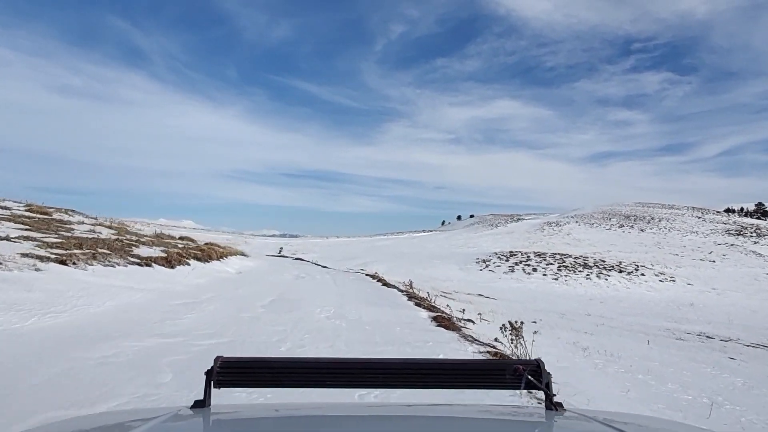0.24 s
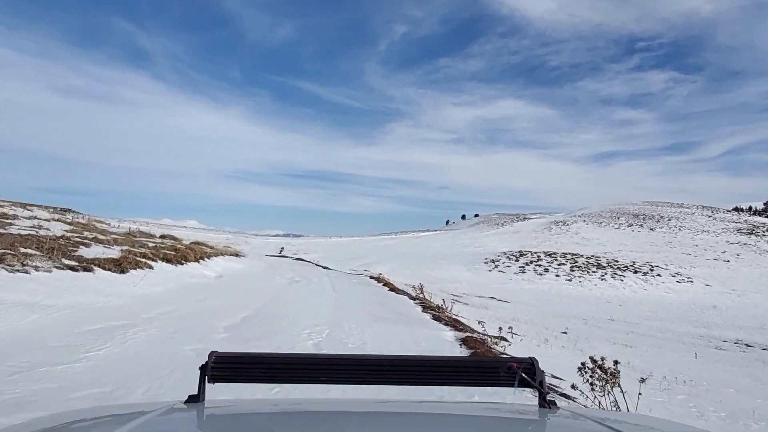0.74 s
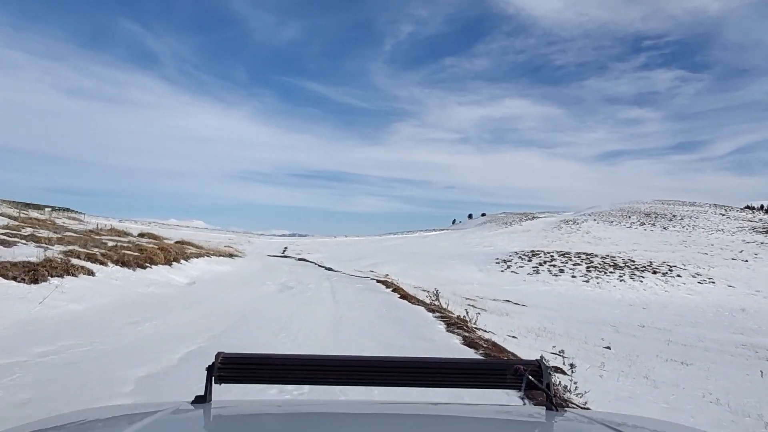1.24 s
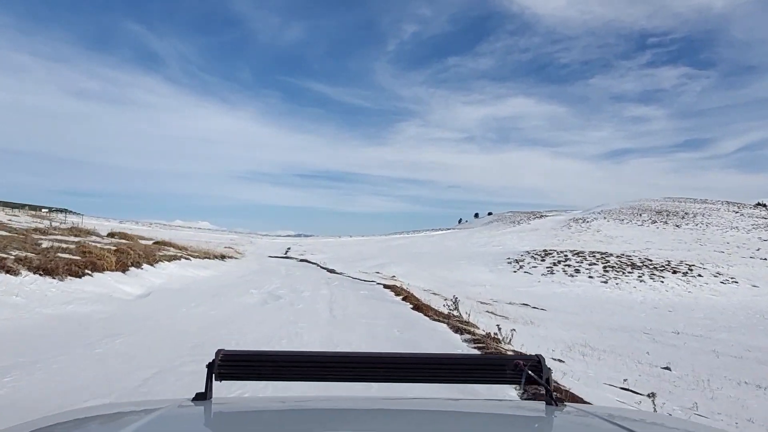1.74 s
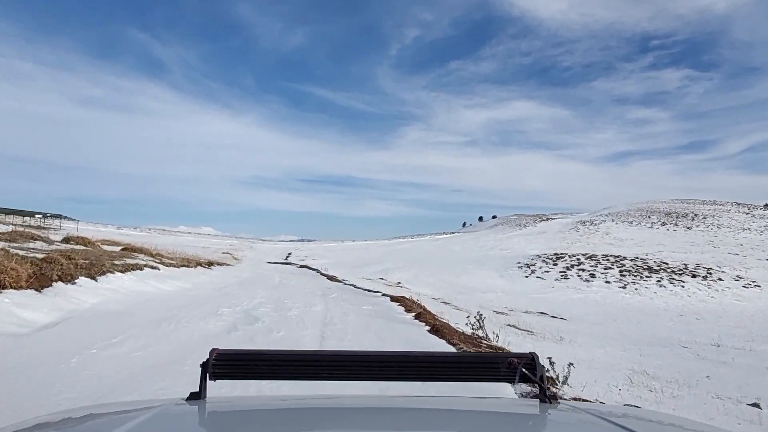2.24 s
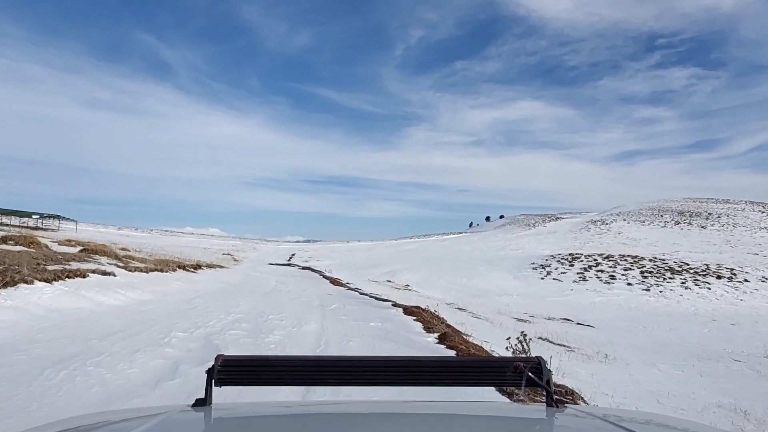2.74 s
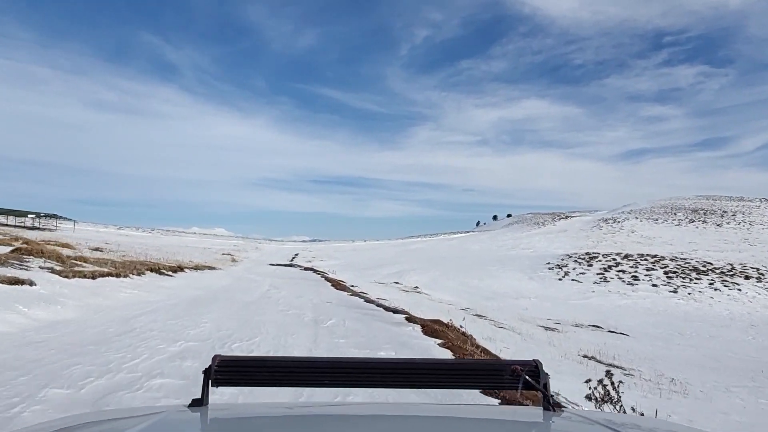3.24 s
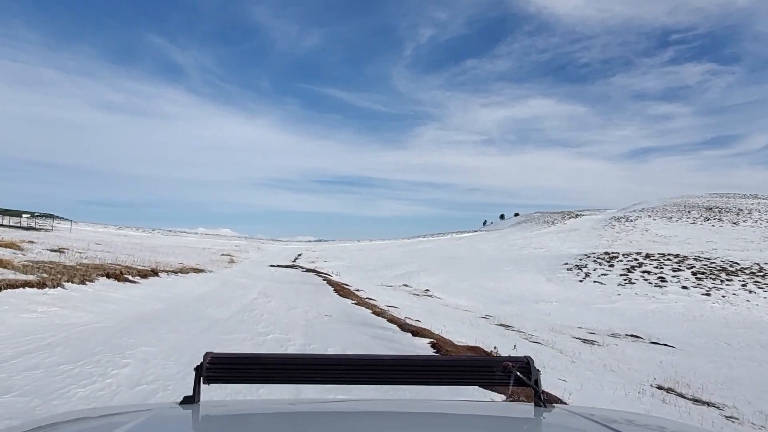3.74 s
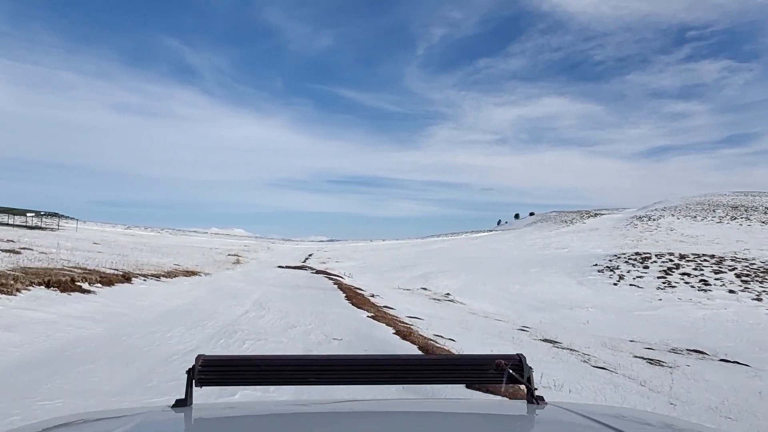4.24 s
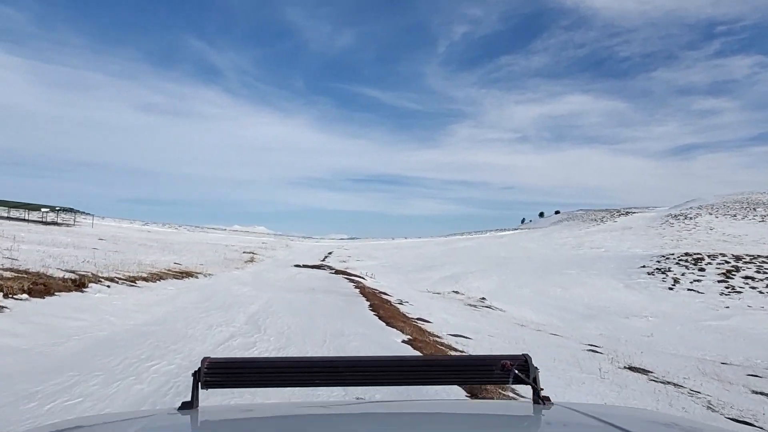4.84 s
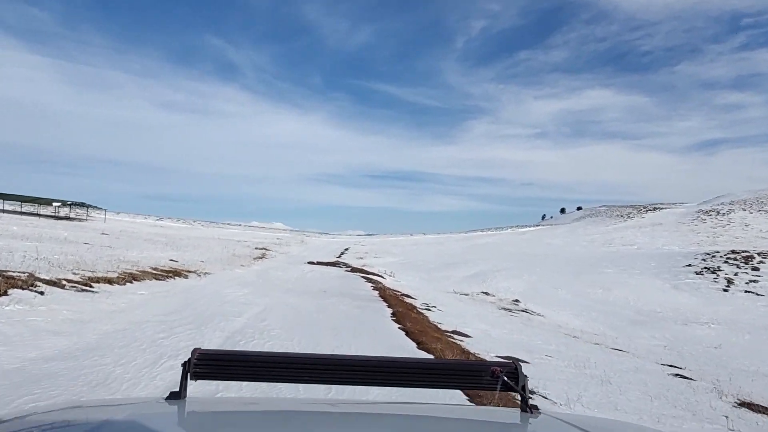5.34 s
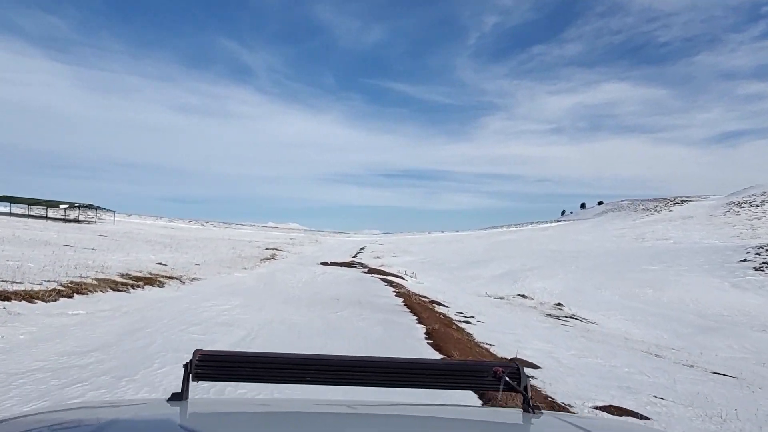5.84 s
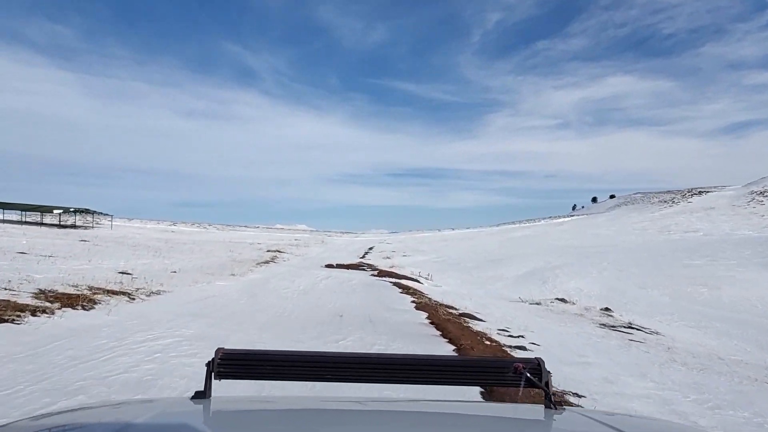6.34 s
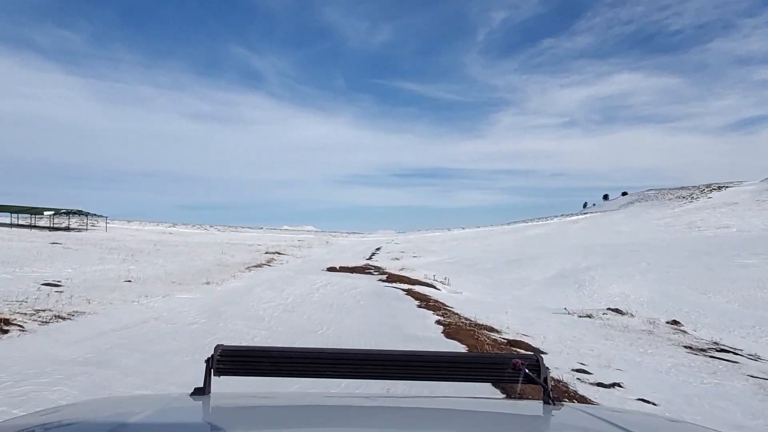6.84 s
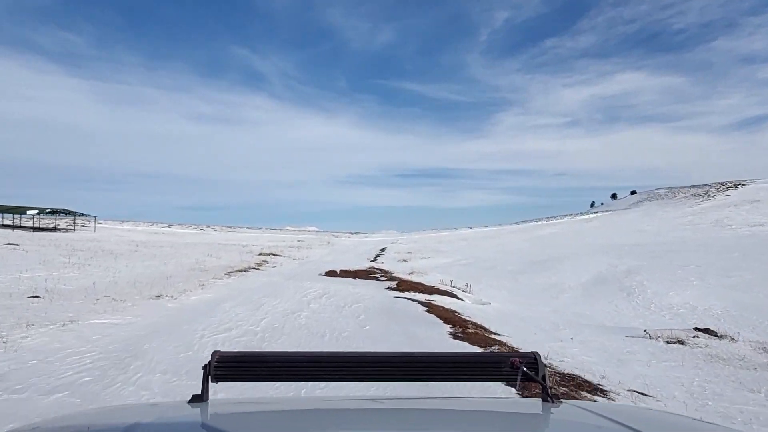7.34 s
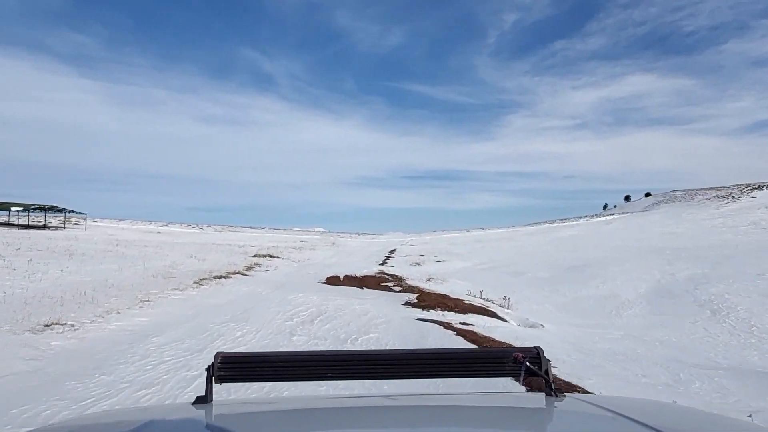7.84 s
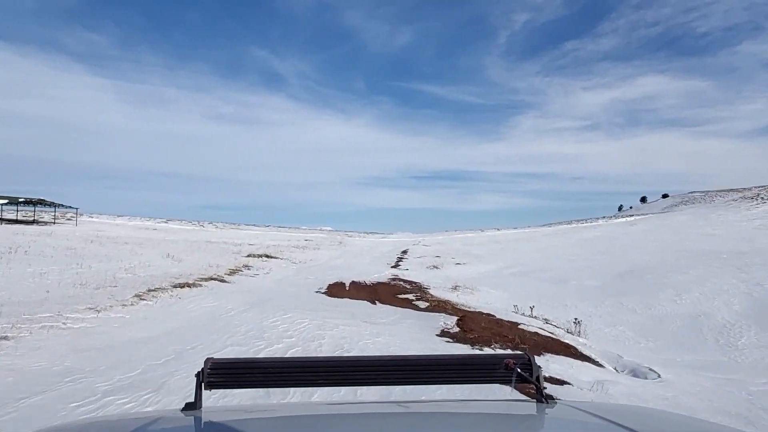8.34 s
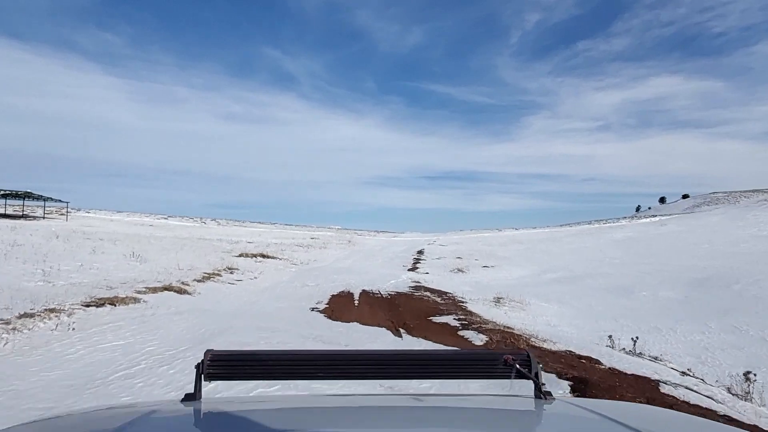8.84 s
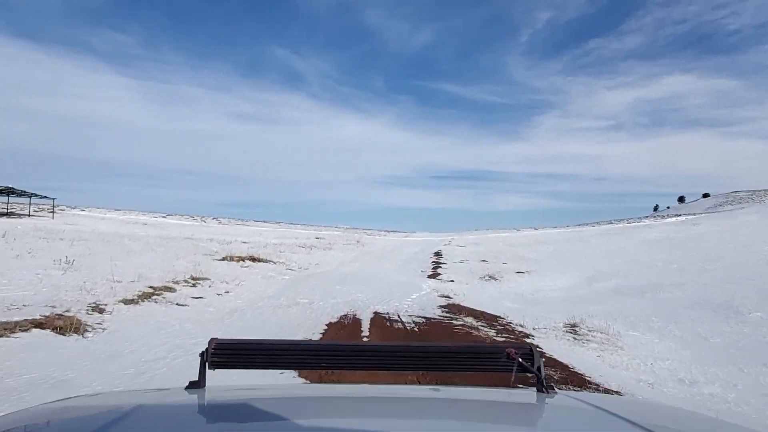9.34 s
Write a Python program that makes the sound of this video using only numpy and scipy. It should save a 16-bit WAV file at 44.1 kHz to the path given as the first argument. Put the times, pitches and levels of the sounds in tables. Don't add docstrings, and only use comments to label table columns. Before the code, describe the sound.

Inside an off-road car on snow, a high eight-cylinder drone drops through a gear change with a clunk, then climbs again amid rising whine.

```python
import sys
import numpy as np
from scipy import signal
from scipy.fft import rfft, irfft, next_fast_len
from scipy.io import wavfile
from scipy.ndimage import uniform_filter1d

SR = 44100
rng = np.random.default_rng(int(sys.argv[2]) if len(sys.argv) > 2 else 0)


def to_wav(s):
    ch = np.atleast_2d(s).T
    pcm = np.round(np.clip(ch, -1, 1) * 32767)
    wavfile.write(sys.argv[1], SR, pcm.astype(np.int16))


def rack_gain(trim_db):
    fader = np.asarray(trim_db, float)
    return 10 ** (fader / 20)


N = 422478
TIME = np.arange(N) / SR
SHIFT_S = 4.4


def unit(x):
    return x / np.sqrt(np.mean(x ** 2) + 1e-20)


def along(points, hz):
    f, v = np.transpose(points)
    return np.interp(np.log(hz + 1), np.log(f + 1), v)


def curves(rows):
    s, *columns = np.transpose(rows)
    return [np.interp(TIME, s, column) for column in columns]


def swells(rows):
    return sum(db * np.exp(-((TIME - s) / half) ** 2) for s, half, db in rows)


def wobble(rate):
    knots = rng.standard_normal(int(N * rate / SR) + 4)
    return np.interp(np.arange(N) * rate / SR, np.arange(len(knots)), knots)


def filtered(x, response):
    m = next_fast_len(N + 8192)
    return irfft(rfft(x, m) * response(np.fft.rfftfreq(m, 1 / SR)), m)[..., :N]


def panned(x, lean_db):
    left = 2 / (1 + rack_gain(-lean_db))
    return np.array([x * left, x * (2 - left)])


def tone(cycles, db, waver_db, drift):
    phase = 2 * np.pi * (cycles + rng.random() + drift * wobble(9))
    return np.sqrt(2) * rack_gain(db + waver_db * wobble(7)) * np.sin(phase)


# (frequency [Hz], likeness [0 to 1])
SIDES_ALIKE = [(30, .97), (130, .95), (300, .85), (600, .6), (1200, .45), (2500, .35), (5000, .15),
               (12000, .08)]
# (frequency [Hz], left minus right [dB])
SIDE_LEAN = [(25, -4), (60, 2), (110, -7.5), (200, -6.5), (380, -9), (700, -5), (1290, -4.5), (2380, -5),
             (4400, -2.5), (8120, -7), (15000, -11)]
# (frequency [Hz], left leads by [radians])
SIDE_LEAD = [(300, -0.18), (700, 2.22), (1000, 1.54), (1900, 0.44), (2400, -1.7), (3500, 1.6)]


def rush(spectrum, patchy_db):
    z = signal.stft(rng.standard_normal((2, N)), nperseg=512)[2]
    patches = uniform_filter1d(rng.standard_normal(z.shape[1:]), size=6, axis=0)
    patches = uniform_filter1d(patches, size=14, axis=1)
    pair = signal.istft(z * rack_gain(patchy_db * unit(patches)), nperseg=512)[1][:, :N]

    def shared_and_opposed(hz):
        angle = np.arccos(np.clip(along(SIDES_ALIKE, hz), -1, 1)) / 2
        return rack_gain(along(spectrum, hz)) * np.array([np.cos(angle), np.sin(angle)])

    def left_and_right(hz):
        lean = rack_gain(along(SIDE_LEAN, hz) / 2) * np.exp(.5j * along(SIDE_LEAD, hz))
        return lean ** np.array([[1], [-1]])

    shared, opposed = filtered(pair, shared_and_opposed)
    both = filtered(np.array([shared + opposed, shared - opposed]), left_and_right)
    return both / np.std(both.mean(axis=0))


# (frequency [Hz], level [dB per Hz])
BOOM_COLOR = [(8.8, -47.5), (15, -12.5), (22, -11.5), (49, 3.5), (102, 2), (116, -3), (130, -11),
              (170, -49), (290, -120)]
# (middle [s], half length [s], level [dB])
RUTS = [
    (2.9, 0.9, 3),
    (4.75, 0.25, 1.5),
    (6.5, 0.54, 2.5),
    (8, 1.3, 1.5),
]


def cabin_boom():
    return rack_gain(-34 + swells(RUTS)) * rush(BOOM_COLOR, patchy_db=.6)


# (time [s], level [dB])
EFFORT = [(0, -2), (1, 0), (2.6, 0), (3.25, 0), (4.1, 0.5), (4.29, 0), (4.36, -1.5), (4.7, -5.5),
          (5.1, -4.5), (5.4, -5.5), (6.1, -3.5), (6.45, 0), (7.2, -3.5), (8.3, -6.5), (9.58, -6)]


def effort():
    return curves(EFFORT)[0]


# (frequency [Hz], level [dB])
BODY_COLOR = [(47, -19), (80, -14.5), (113, -13.5), (129, 7.5), (177, -3.5), (332, -2.5), (408, -3),
              (457, -14.5), (497, -22.5), (616, -31.5), (683, -20.5), (750, -31.5), (980, -61),
              (1650, -120)]


def body_noise():
    return rack_gain(-29 + 1.23 * effort()) * rush(BODY_COLOR, patchy_db=.6)


# (frequency [Hz], level [dB])
RUSH_COLOR = [(280, -25.5), (480, 3.5), (513, -5.5), (557, -4), (669, -5.5), (727, -5), (790, -10.5),
              (910, -5.5), (1080, -11.5), (1290, -10), (1600, -13), (1910, -11.5), (2770, -22), (3040, -27),
              (3500, -28), (4550, -65.5), (7700, -120)]
# (frequency [Hz], level [dB])
VALVE_COLOR = [(1800, -40), (2300, 0), (2900, 0), (3200, -40)]


def middle_rush(cycles, gust):
    throb = 1 + .12 * np.sin(2 * np.pi * 4 * cycles) + .05 * np.sin(2 * np.pi * 6 * cycles)
    rush_db = -38 + 1.025 * effort()
    wind = rack_gain(rush_db + .3 * gust) * throb * rush(RUSH_COLOR, patchy_db=.7)
    low_gear = np.clip(SHIFT_S - TIME, 0, .5) * 2
    clatter = low_gear * rack_gain(rush_db - 16) * throb * rush(VALVE_COLOR, patchy_db=2)
    return wind + clatter


# (frequency [Hz], level [dB])
SPRAY_COLOR = [(1470, -22), (2500, -1), (2800, -5), (3290, -6.5), (3750, -5), (3870, -4), (4270, -2),
               (4680, -8.5), (5540, -8), (6710, -11.5), (10100, -19.5), (11400, -18), (15600, -23)]
# (middle [s], half length [s], level [dB])
THROWN_SNOW = [
    (3.25, .1, 2),
    (3.66, .07, 3),
    (3.87, 0.078, 2),
    (4.26, .06, 2),
    (6.3, .15, -1.5),
]


def snow_spray(gust):
    spray_db = -50.5 + 1.14 * effort() + swells(THROWN_SNOW)
    return rack_gain(spray_db + .91 * gust) * rush(SPRAY_COLOR, patchy_db=.94)


def road(cycles):
    gust = wobble(11)
    return cabin_boom() + body_noise() + middle_rush(cycles, gust) + snow_spray(gust)


def bursts(rows, t60, rise):
    marks, t = np.zeros(N), np.arange(SR // 10) / SR
    for s, db in rows:
        marks[int(s * SR)] = rack_gain(db)
    shape = rack_gain(-60 * t / t60) * (1 - np.exp(-t / rise))
    return signal.fftconvolve(marks, shape)[:N]


def per_turn(bouts, cycles):
    turns_per_cycle = np.where(TIME < SHIFT_S, 1.035, 1.8)
    turns = np.cumsum(np.gradient(cycles) * turns_per_cycle)
    rows = []
    for first, last, db in bouts:
        a, b = np.interp([first, last], TIME, turns)
        times = np.interp(np.linspace(a, b, round(abs(b - a)) + 1), turns, TIME)
        chance = rng.standard_normal((12, 2))[:len(times)] * (len(times) > 2)
        rows += list(zip(times + .0006 * chance[:, 0], db + 1.6 * chance[:, 1]))
    return rows


# (first [s], last [s], peak level [dB])
SCUFF_BOUTS = [(.1114, .2599, -43.5), (.5134, .5134, -39), (.806, .806, -43), (.9031, .9031, -42),
               (1.105, 1.5928, -44.5), (2.0448, 2.194, -42), (2.2412, 2.2412, -37.5),
               (2.586, 2.6344, -40.5), (2.8759, 2.926, -41), (3.024, 3.069, -38), (3.311, 3.311, -36),
               (3.6079, 3.6079, -42.5), (4.5507, 4.5507, -39.5), (5.214, 5.214, -36),
               (5.3148, 5.3148, -42.5), (5.5497, 5.5497, -38.5), (5.658, 5.658, -42),
               (5.888, 5.9292, -43.5), (6.1743, 6.1743, -44.5), (6.5247, 6.5247, -44.5),
               (6.8773, 6.8773, -44.5), (7.321, 7.321, -46.5), (7.66, 7.66, -45), (9.195, 9.241, -47),
               (9.4663, 9.4663, -45)]
# (frequency [Hz], level [dB])
SCUFF_COLOR = [(3000, -37.5), (5500, 6), (8000, -12.5), (11300, -2), (13000, -2), (15000, -9)]


def plastic_scuffs(cycles):
    noise = filtered(rng.standard_normal((2, N)), lambda hz: rack_gain(along(SCUFF_COLOR, hz)))
    brush = rack_gain(-3) * bursts(per_turn(SCUFF_BOUTS, cycles), t60=.07, rise=.002) * unit(noise)
    return brush * rack_gain([[-8], [2]])


# (first [s], last [s], peak level [dB])
TICK_BOUTS = [(.1705, .263, -50), (.7978, .7978, -42.5), (1.0535, 1.4489, -46.5), (1.5398, 1.5398, -39.5),
              (1.6881, 1.7883, -40), (2.1849, 2.2812, -36.5), (2.381, 2.381, -42), (2.4795, 2.6736, -37),
              (2.9185, 3.0146, -40), (3.1127, 3.2091, -37.5), (3.7475, 3.7475, -38.5),
              (3.9605, 3.9605, -39.5), (4.1975, 4.1975, -38), (4.974, 5.0998, -41), (5.148, 5.198, -44),
              (5.5493, 5.6336, -35.5), (5.68, 5.8475, -40), (5.888, 6.05, -36.5), (6.097, 6.1742, -40.5),
              (6.219, 6.3325, -41.5), (6.369, 6.4882, -37), (6.5248, 6.563, -32.5), (6.603, 6.755, -36),
              (6.792, 7.0768, -41.5), (7.115, 7.2569, -41.5), (7.2865, 7.53, -42), (7.5632, 7.6606, -37),
              (7.6959, 7.762, -42.5), (7.795, 7.8265, -38.5), (9.1546, 9.1546, -40.5)]
# (frequency [Hz], width [Hz], level [dB])
TRIM_MODES = [(1900, 1000, 7), (2840, 2400, 22.5), (4550, 680, -2), (5810, 910, -4), (7160, 500, -6.5)]


def ringing(modes):
    def response(f):
        return sum(rack_gain(db) * (f * w) ** 2 / ((c * c - f * f) ** 2 + (f * w) ** 2) for c, w, db in modes)
    return unit(filtered(rng.standard_normal((2, N)), response))


def trim_ticks(cycles):
    hits = per_turn(TICK_BOUTS, cycles)
    snaps = [(s, db - 4 * (s < SHIFT_S)) for s, db in hits]
    rebounds = [(s + .005, db - 1) for s, db in hits]
    ticks = rack_gain(-3) * bursts(snaps, t60=.022, rise=.0003) * ringing(TRIM_MODES[2:])
    ticks += bursts(rebounds, t60=.035, rise=.0005) * ringing(TRIM_MODES)
    return ticks * rack_gain([[1], [-1]])


# (time [s], level [dB])
LEVER = [
    (4.692, -28.5),
]


def lever_clunk():
    return bursts(LEVER, t60=.04, rise=.001) * np.sin(2 * np.pi * 610 * TIME)


# (time [s], meeting rate [Hz], level [dB])
AXLE_TEETH = [(6.9, 690, -68), (7.25, 703, -55.5), (7.6, 709, -54), (8, 717, -51), (8.5, 736, -53),
              (8.8, 748, -61.5), (9.2, 726, -55.5), (9.58, 750, -63)]
# (multiple of the rate [ratio], level [dB])
TEETH_TONES = [(1.001, 0), (1.51, -7), (1.79, -5)]


def axle_song():
    mesh_hz, mesh_db = curves(AXLE_TEETH)
    teeth = np.cumsum(mesh_hz) / SR
    song = sum(tone(k * teeth, mesh_db + db, waver_db=2, drift=.08) for k, db in TEETH_TONES)
    return panned(song, lean_db=-2)


# (time [s], frequency [Hz], level [dB])
SHUDDER = [
    (5.8, 59.8, -65),
    (5.95, 61.2, -27.5),
    (6.3, 63.6, -33),
    (6.7, 68.5, -31),
    (7.05, 70.6, -36),
    (7.3, 72, -65),
]


def clutch_shudder():
    hz, db = curves(SHUDDER)
    return panned(tone(np.cumsum(hz) / SR, db, waver_db=1.5, drift=.03), lean_db=-7.5)


# (time [s], level [dB])
GEAR_WHINE = [(5.2, -57), (5.4, -50.5), (5.8, -49.5), (6, -58), (6.4, -49.5), (7.1, -53), (7.3, -41),
              (8, -48.5), (9.58, -48)]


def belt_gear(cycles):
    whine = tone(51.4 * cycles, curves(GEAR_WHINE)[0], waver_db=1.5, drift=.06)
    return panned((TIME > GEAR_WHINE[0][0]) * whine, lean_db=-6)


# (time [s], firing rate [Hz], firing tone level [dB])
REVS = [(0, 157, -22.5), (1.4, 157.5, -18.5), (2.6, 160, -20), (3.2, 163.5, -18.5), (3.5, 167, -16.5),
        (4.15, 172.8, -18.5), (4.3, 165.6, -14.5), (4.42, 154, -16.5), (4.6, 143, -7.5), (4.72, 135, -13.5),
        (4.9, 126, -14.5), (5.05, 104, -28), (5.2, 92, -30.5), (5.45, 104, -24.5), (6.28, 114, -29.5),
        (6.62, 118.5, -15.5), (7.7, 133.5, -11.5), (9.58, 143, -12.5)]
# (time [s], swing [Hz], swing [dB], fade [s], rocking rate [Hz])
ROCKING = [
    (1.899, 1.21, 1, 1.6, 2.48),
    (5.35, 3.5, 0, .5, 2.54),
    (6.799, 1.98, 3, 0.52, 2.5),
    (7.2, 3, 0.5, .5, 2.6),
    (8.8, 5, 0.2, .6, 1.9),
]


def revs():
    firing_hz, firing_db = curves(REVS)
    for s, swing_hz, swing_db, fade, rock_hz in ROCKING:
        t = np.maximum(TIME - s, 0)
        rock = np.sin(2 * np.pi * rock_hz * t) * np.exp(-t / fade)
        firing_hz = firing_hz + swing_hz * rock
        firing_db = firing_db + swing_db * rock
    return firing_hz, firing_db


# (order [per engine cycle], low gear level [dB], high gear level [dB])
CRANK_ORDERS = [(4, -4.5, 3), (6, 4, 5.5), (10, -22.5, -2.5), (14, -13.5, -15.5), (18, -11.5, -17.5),
                (20, -7.5, -6), (22, -13, -8), (24, -13.5, -11.5), (26, -16, -17.5), (28, -32, -12),
                (30, -23, -15), (32, -18, -20.5), (36, -19.5, -23.5), (40, -25.5, -27), (44, -24, -31.5),
                (46, -23.5, -31.5), (48, -26.5, -29), (52, -29.5, -34.5), (58, -30.5, -32.5),
                (65.2, -28, -36.5)]
# (order [per engine cycle], low gear level [dB], high gear level [dB])
ODD_ORDERS = [(3, -9.5, -13), (5, -11.5, -8), (7, -1.5, -6.5), (9, -5.5, -4), (15, -27.5, -15.5),
              (17, -12.5, -15.5), (19, -41.5, -15)]
# (frequency [Hz], level [dB])
CABIN_ANSWER = [(40, -10.5), (62, -1.5), (95, -7.5), (145, 5.5), (200, -8), (260, -0.5), (310, 0.5),
                (350, 5), (375, 5.5), (400, 2), (450, -7), (510, 2), (600, -6), (900, 0)]
# (time [s], share of full combustion [0 to 1])
THROTTLE = [
    (0, 1),
    (3.3, 1),
    (4.15, .6),
    (4.4, 0),
    (5.2, 0),
    (5.5, 1),
    (9.58, .9),
]


def engine_orders(firing_hz, cycles):
    high_gear = np.clip((TIME - SHIFT_S) / .6 + .5, 0, 1)
    crank_db = -29 + 1.58 * effort()
    odd_db = -28.5 - 12 * high_gear
    soft_db = -7 * (1 - curves(THROTTLE)[0])
    out = np.zeros((2, N))
    for family, family_db, stretch in ((CRANK_ORDERS, crank_db, 1), (ODD_ORDERS, odd_db, 1.035)):
        for order, low_db, high_db in family:
            nearest = 8 * round(order / 8)
            turns = nearest + (round(order) - nearest) * stretch
            hz = turns * firing_hz[::64] / 8
            cabin_db = np.repeat(along(CABIN_ANSWER, hz), 64)[:N]
            gear_db = low_db + (high_db - low_db) * high_gear
            level_db = family_db + cabin_db + gear_db + soft_db * (turns > 13)
            waver_db = 1.6 + .07 * turns * high_gear
            line = tone(turns * cycles, level_db, waver_db, drift=.0015 * turns * (1 + high_gear))
            out += panned(line, along(SIDE_LEAN, hz.mean()))
    return out


# (firing rate [Hz], left minus right [dB])
STANDING = [(95, -2), (108, -1.5), (114, 5), (118, -5.5), (150, -4.5), (156.5, -3), (160, 0.5), (170, 5)]
# (firing rate [Hz], level [dB])
OCTAVE_ANSWER = [(100, -43), (116, -34.5), (123, -38.5), (140, -37), (158, -35), (166, -32.5), (173, -21.5)]
# (middle [s], half length [s], level [dB])
BARK = [
    (4.31, 0.16, 6.5),
    (.2, 0.33, -5.5),
    (6.4, .3, 1),
    (5.4, .2, 0),
]
# (middle [s], half length [s], level [dB])
HALFWAY = [
    (3.95, .3, 13),
    (4.5, 0.15, 15.5),
    (5.15, 0.44, 15.5),
    (6.75, .3, 16.5),
]


def engine(firing_hz, firing_db, cycles):
    octave_db = along(OCTAVE_ANSWER, firing_hz) + swells(BARK)
    halfway_db = -49.5 + swells(HALFWAY)
    out = panned(tone(8 * cycles, firing_db, waver_db=.4, drift=.01), along(STANDING, firing_hz))
    out += panned(tone(16 * cycles, octave_db, waver_db=2.2, drift=.04), lean_db=-8)
    out += panned(tone(12 * cycles, halfway_db, waver_db=1.5, drift=.03), lean_db=-3)
    return out + engine_orders(firing_hz, cycles)


def scene():
    firing_hz, firing_db = revs()
    cycles = np.cumsum(firing_hz) / SR / 8
    noises = road(cycles) + plastic_scuffs(cycles) + trim_ticks(cycles) + lever_clunk()
    cabin = filtered(noises, lambda hz: hz < 15750)
    cabin += axle_song() + clutch_shudder() + belt_gear(cycles)
    cabin += engine(firing_hz, firing_db, cycles)
    fade_out = np.sin(np.pi / 2 * np.clip(TIME[::-1] / .0015, 0, 1)) ** 2
    return cabin * fade_out


def band_limit(x):
    return signal.sosfilt(signal.butter(12, 15710, fs=SR, output="sos"), x)


def record(dry):
    return band_limit(dry)


dry = scene()
out = record(dry)
to_wav(out)
```